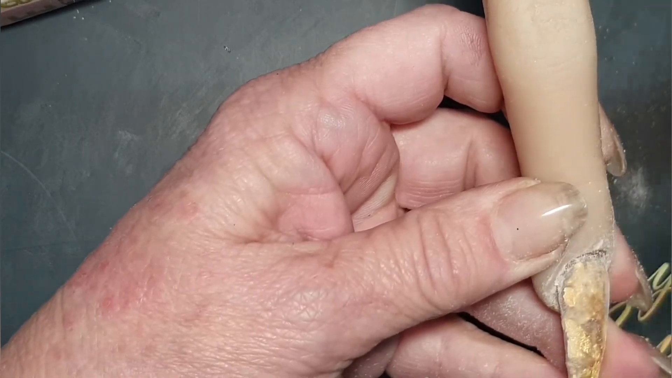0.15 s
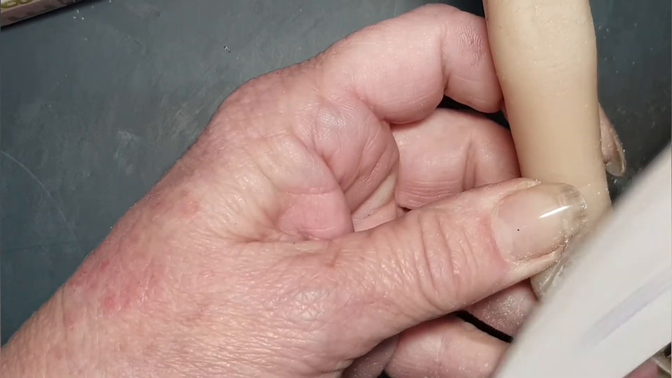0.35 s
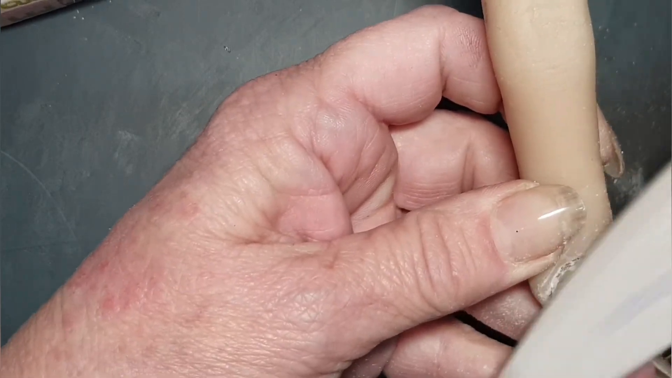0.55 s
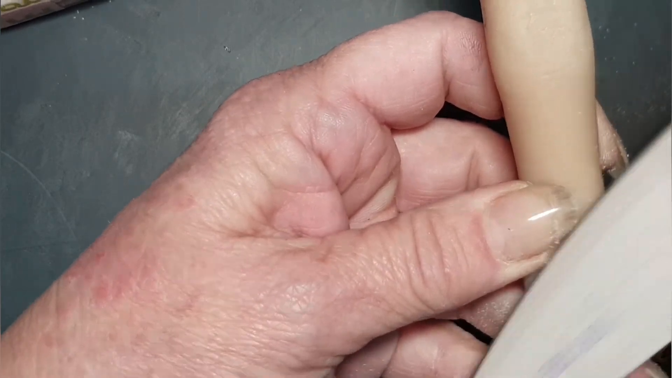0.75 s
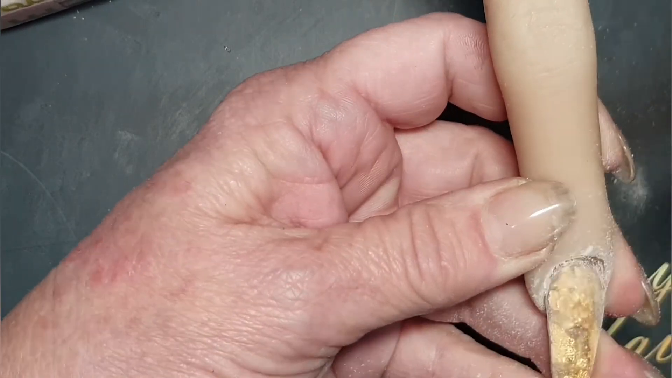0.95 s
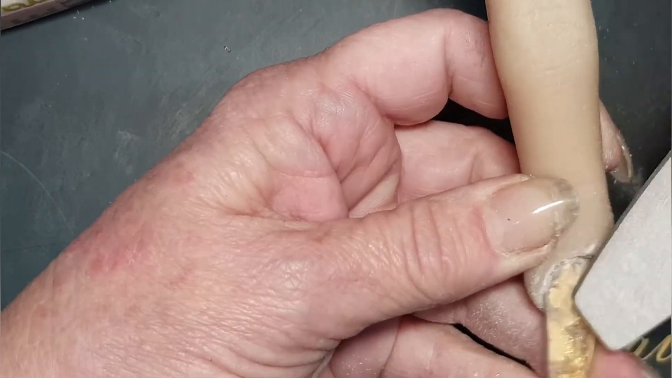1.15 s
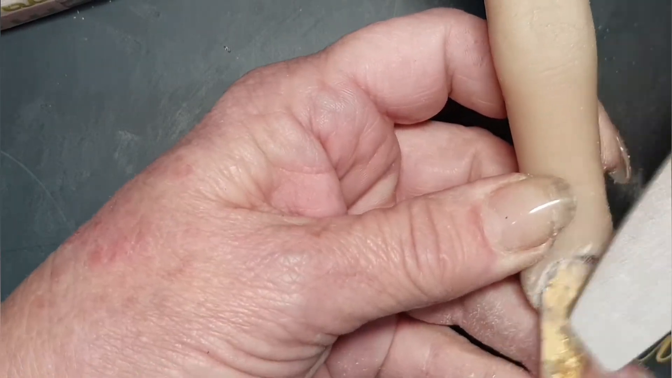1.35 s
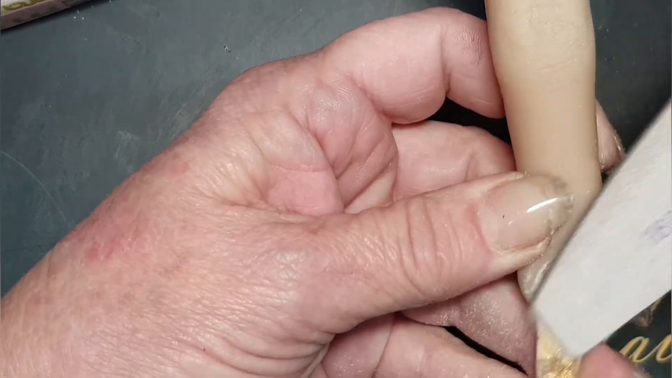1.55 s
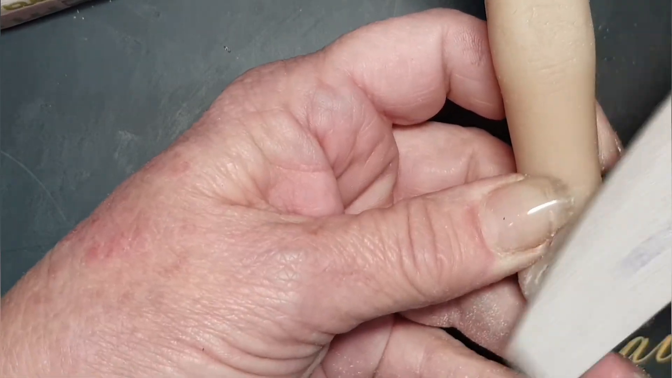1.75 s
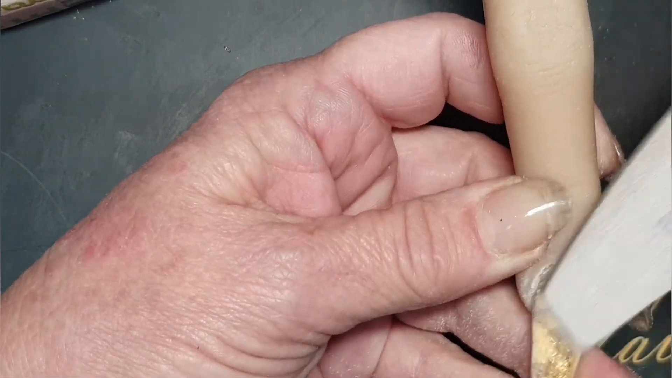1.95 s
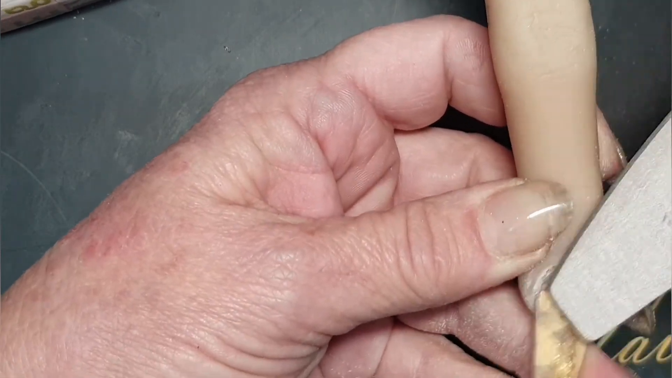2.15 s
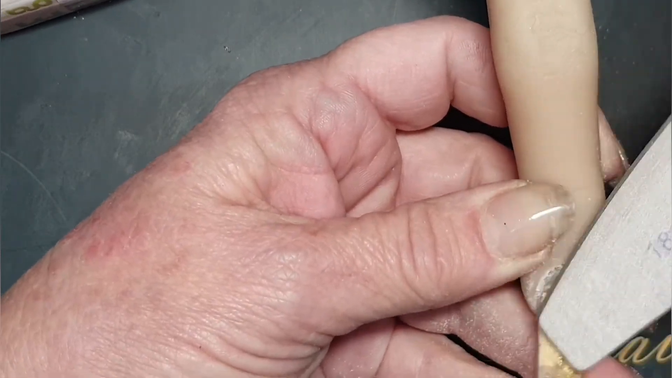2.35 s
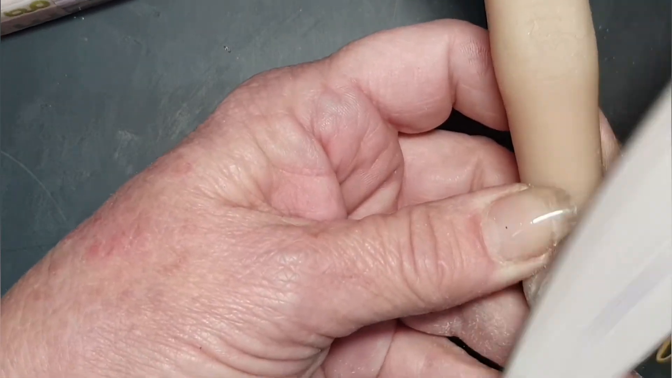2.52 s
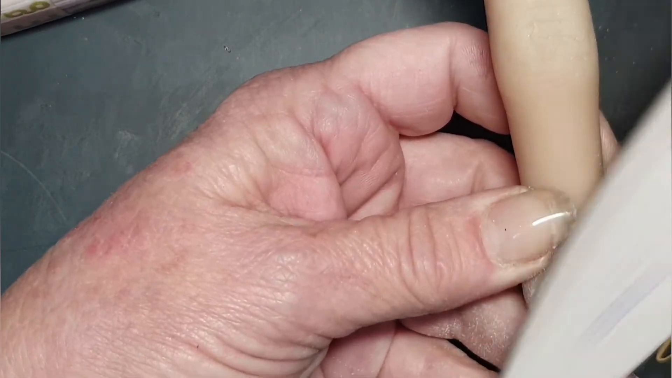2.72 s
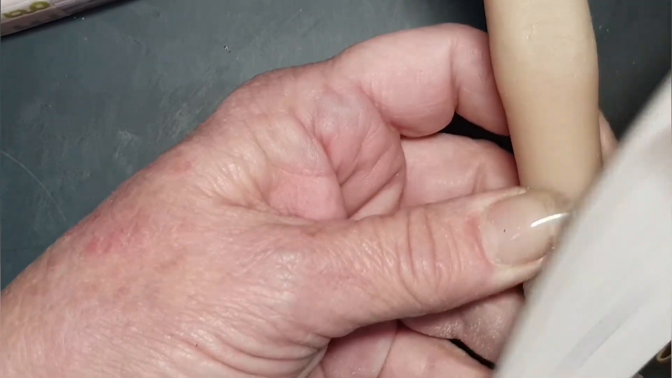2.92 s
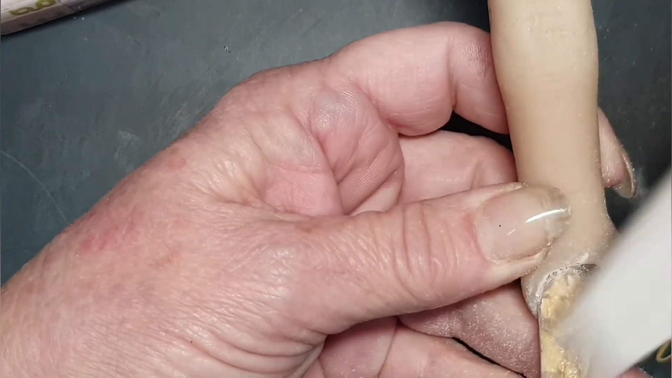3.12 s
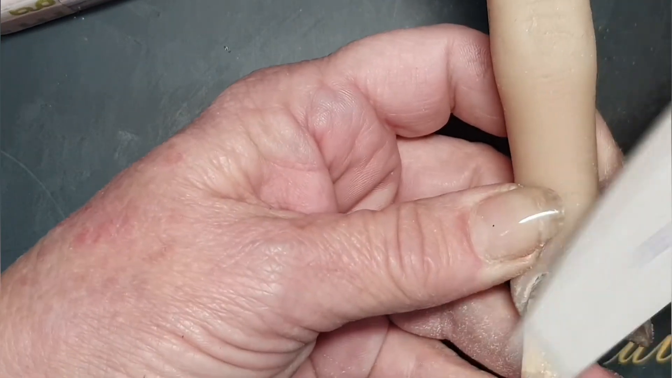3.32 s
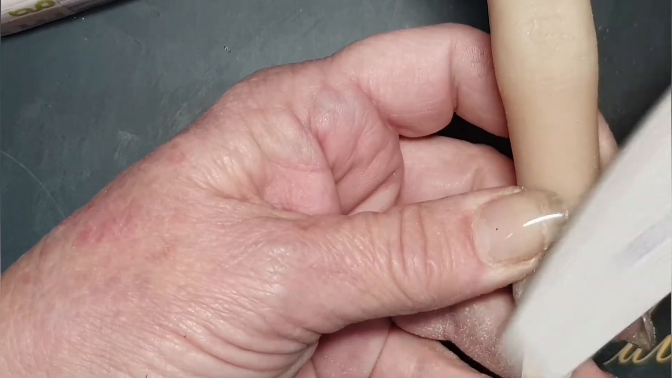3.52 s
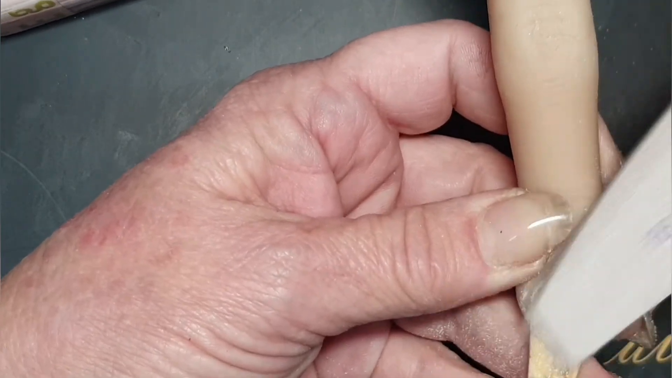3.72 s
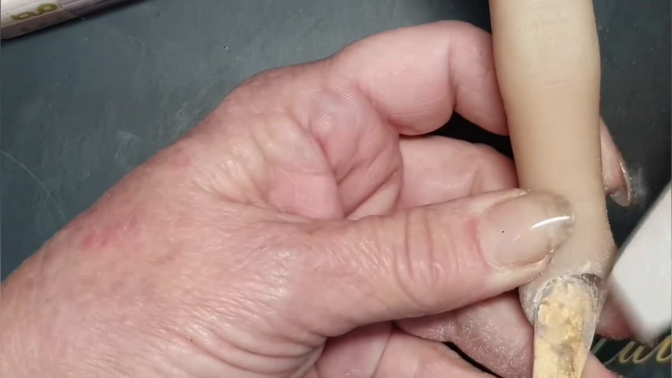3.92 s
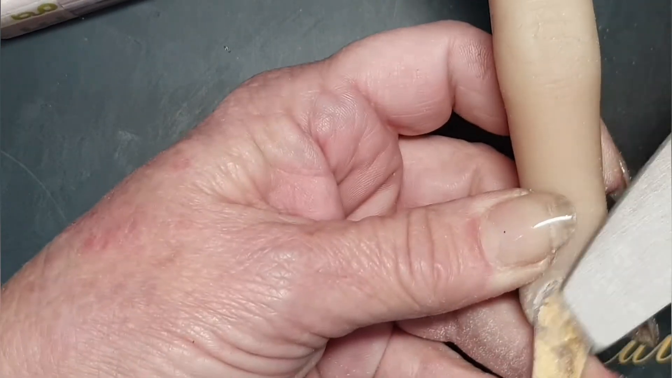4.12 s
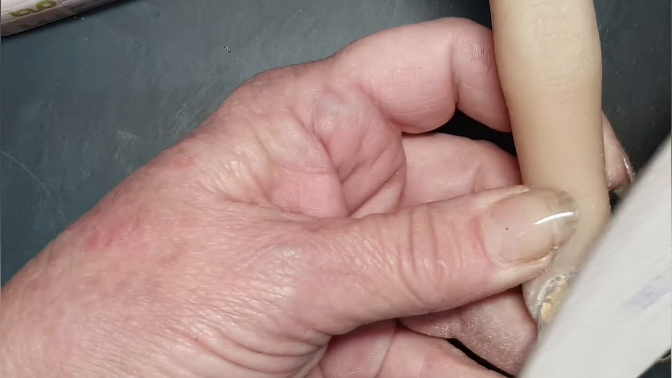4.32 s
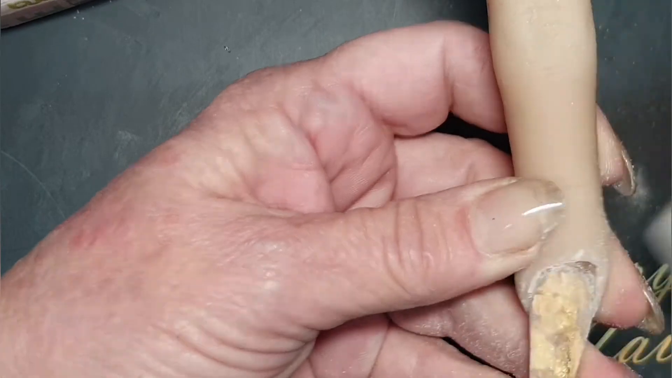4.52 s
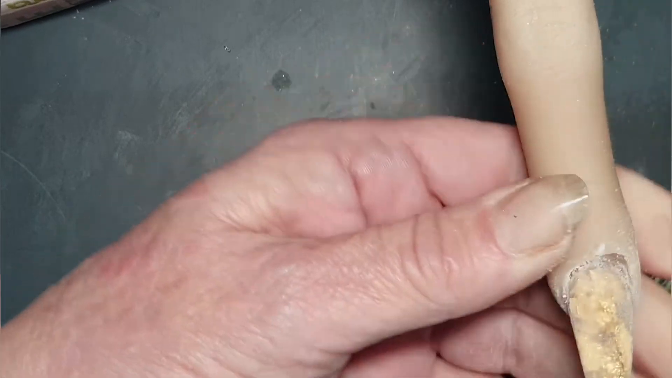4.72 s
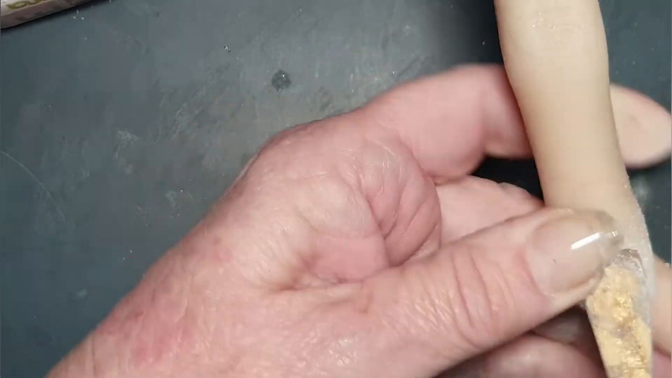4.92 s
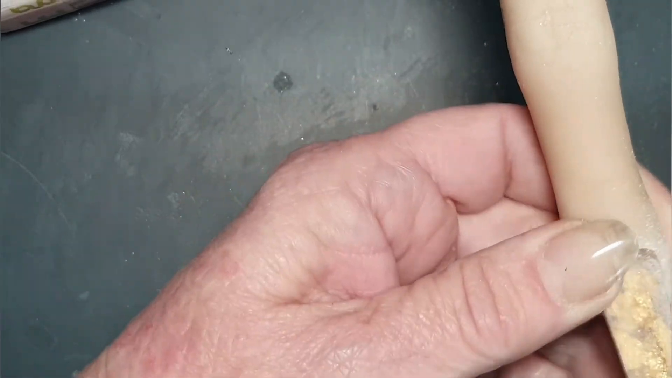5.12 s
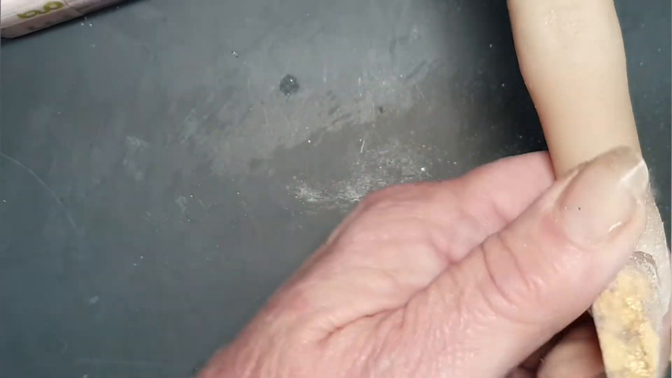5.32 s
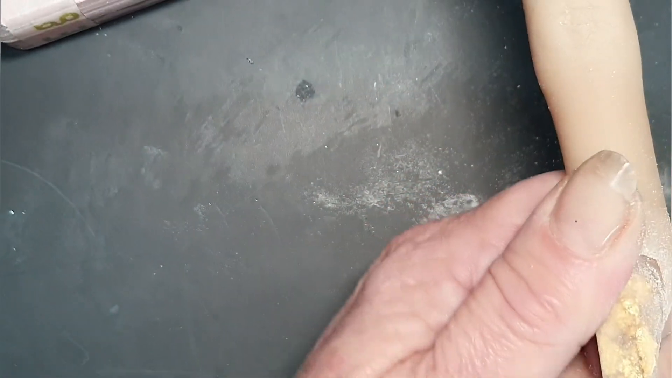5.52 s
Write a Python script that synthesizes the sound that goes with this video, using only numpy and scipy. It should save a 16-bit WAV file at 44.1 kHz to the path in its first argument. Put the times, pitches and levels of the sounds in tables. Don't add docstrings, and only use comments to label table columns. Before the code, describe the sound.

Close up in a small quiet room, a fine hand file scrapes a hard acrylic nail on a practice finger, quick gritty strokes to and fro in five bouts, each push shaking the desk with a low dull thump. Bouts end in short bright skids. Then the loose file slides away with a faint singing scrape, and a thumb wipes dust off with soft hiss and tiny crackles. Stereo microphones stand on the same desk.

```python
import sys
import numpy as np
from scipy import signal
from scipy.fft import rfft, irfft, next_fast_len
from scipy.io import wavfile
from scipy.ndimage import uniform_filter1d

SR = 44100
rng = np.random.default_rng(int(sys.argv[2]) if len(sys.argv) > 2 else 0)


def store_wav(level_fs):
    pcm = np.round(np.clip(np.atleast_2d(level_fs), -1, 1) * 32767)
    wavfile.write(sys.argv[1], SR, pcm.T.astype(np.int16))


def boost(x):
    u = np.asarray(x, float) / 20
    return 10 ** u


N = 250047
SIZE = next_fast_len(N + SR // 2)
HZ = np.maximum(np.arange(SIZE // 2 + 1) * SR / SIZE, 1)
CUTOFF_HZ = 15750

# [f/Hz, level/dB]
FLOOR = [(53, -19), (90, 5), (139, -27), (249, -8.5), (409, -22.5), (799, -31), (1900, -39), (2260, -35),
         (2510, -36), (15800, -40)]
FLOOR_DB = -68

# [f/Hz, level/dB]
RASP_SIDE = [(60, -18.5), (330, -13.5), (500, -8.5), (1170, -5.5), (1700, -5), (2400, 2.5), (3100, -6),
             (4100, 0.5), (5500, -2.5), (6300, 2), (7300, -0.5), (7700, -22), (9200, -10.5), (15000, -18)]
# [f/Hz, level/dB]
LEAN = [(60, -7), (92, 2), (140, -9.5), (210, -4), (330, -2), (500, 0.0), (770, -6.5), (1170, -10),
        (1790, -8), (2740, 3), (4190, -3.5), (6410, -4), (9810, -0.5), (15000, -3.5)]
PORT_QUADRATURE = 0.69

# [start t/s, length t/s, rasp level/dB, desk level/dB, swell level/dB]
PUSHES = [(0.017, 0.073, -39, -45.5, 9.5), (0.476, 0.06, -47, -51, 3), (0.683, 0.045, -50, -50, 2),
          (0.868, 0.063, -44, -46.5, 9), (1.145, 0.05, -41.5, -48, 6.5), (1.337, 0.053, -43.5, -46, 1),
          (1.531, 0.051, -41, -45, -0.5), (1.727, 0.044, -40.5, -42.5, 1), (1.92, 0.062, -42, -48, 0.5),
          (2.132, 0.061, -41, -43.5, 0.5), (2.342, 0.055, -41.5, -44, 2), (2.548, 0.057, -41, -43, -0.5),
          (2.753, 0.062, -43, -47, -1), (2.958, 0.063, -42.5, -46.5, -2.5), (3.286, 0.058, -40.5, -45, 2),
          (3.485, 0.054, -40, -41.5, 1.5), (3.686, 0.059, -43, -47, -2.5), (3.882, 0.06, -48, -49, 11.5),
          (4.1, 0.055, -49.5, -64.5, 5), (4.295, 0.049, -48.5, -51, 7), (4.489, 0.084, -42, -44.5, -3)]
# [start t/s, length t/s, rasp level/dB, desk level/dB, swell level/dB]
PULLS = [(0.372, 0.056, -44.5, -49.5, -0.5), (0.584, 0.051, -47.5, -56.5, -0.5),
         (0.766, 0.054, -46, -55, 6), (1.076, 0.034, -42, -57.5, 5), (1.237, 0.051, -42.5, -53.5, -3.5),
         (1.431, 0.064, -42.5, -49, -7), (1.63, 0.056, -43, -49.5, 0), (1.818, 0.055, -44.5, -48.5, 6.5),
         (2.029, 0.066, -42.5, -49, -1), (2.236, 0.067, -42.5, -49.5, -1.5), (2.442, 0.06, -43, -52.5, 0),
         (2.646, 0.062, -42.5, -53, -0.5), (2.853, 0.061, -41, -49.5, 1.5), (3.215, 0.033, -46, -56, 5.5),
         (3.38, 0.066, -40.5, -48.5, -0.5), (3.576, 0.064, -44, -51, 0.5),
         (3.785, 0.053, -46.5, -55.5, -1.5), (4.194, 0.058, -44.5, -55, -2), (4.381, 0.065, -46, -52, 8)]

# [f/Hz, width f/Hz, level/dB]
DESK = [(222.6, 11.5, -5.5), (253.9, 10.1, -5), (287.8, 20.3, -0.5), (328.1, 17.7, 3), (485.2, 30.4, -7.5),
        (704, 190, -22.5), (852, 43, -20)]
# [f/Hz, width f/Hz, level/dB]
STAND = [(114.8, 19.5, -0.5), (127.8, 17, -2), (145.9, 15.8, -0.5), (162.6, 27.2, 1.5)]
# [t/s, sway level/dB]
SWAY = [(0.0, -66), (0.1, -51), (0.18, -67), (0.28, -60), (0.55, -60), (0.9, -55), (1.02, -61), (1.3, -50),
        (1.8, -57.5), (2.13, -50), (2.63, -57), (3.02, -51.5), (3.17, -62), (3.33, -48), (3.7, -53.5),
        (4.3, -49.5), (4.72, -50), (5.0, -62)]
SWAY_HZ, SWAY_WANDER_HZ = 72.6, 3.03
THUD_PER_SHAKE_DB, THUD_PER_SWAY_DB, THUD_RISE_S, THUD_FALL_S = -5.5, -7.5, 0.038, 0.17
# [t/s, length t/s, sway level/dB, thud level/dB]
BUMPS = [
    (3.413, 0.2, -76, -41),
    (4.436, 0.016, -55, -39),
    (4.675, 0.045, -47.5, -52),
    (4.894, .02, -54, -74),
    (5.202, 0.15, -59.5, -64.5),
]
BUMP_EDGE_S = 0.026
# [t/s, thud level/dB, upper desk level/dB, nail ring level/dB, left minus right level/dB]
BRACE = [(0.05, 2.5, 9.5, -2, -0.1), (0.4, 3, -8, 0.5, 0), (0.5, -9, 8.5, 2, -1), (0.61, 4.5, 0.5, 8, -1),
         (0.71, 2, 3.5, 0, 0), (0.8, 4.5, 3, 8.5, -1), (0.9, -3, -3.5, 2, 0.5), (1.11, 5, -1, -9, 0.2),
         (1.18, 0, 1, -6, 0), (1.27, 4.5, -3, -4, -1.5), (1.37, 2.5, 2, -1, 0.5), (1.46, -1, 0.5, -1, -1),
         (1.56, 0, 2, 2, 0.5), (1.66, 4.5, -3, 2, 1.5), (1.76, -0.5, -3.5, 1.5, 2.5),
         (1.85, -3, 3, -1, 1.5), (1.95, 4.5, 10.5, 2, 1.5), (2.06, -2.5, 5, 3.5, 1), (2.16, 2, 4, 2, 2),
         (2.26, 6, -3, 6, 0), (2.37, 3, 3, 4, 3.5), (2.47, 8, 5.5, 4.5, 2), (2.58, 0.5, 1.7, 5, 2),
         (2.67, 0.5, 4, 4, 1), (2.78, -3, 5.5, 4.5, 1.5), (2.88, 3.5, 3.5, 0, 1.5),
         (2.98, 6.5, -2.5, 7.5, 3.5), (3.25, 5.5, -6, 6.5, 2.5), (3.32, -0.5, 5.5, -5, 1.5),
         (3.41, -0.5, 5.5, 1, 1.5), (3.51, -2, -1.5, 2, 2), (3.61, -1.5, 4, -3.5, 2),
         (3.72, -3.5, -1.5, 1, 3.5), (3.82, 8.5, 9, 3, -1.5), (3.91, 6.5, 3.5, 5, 0.5),
         (4.13, -4.5, -13, -7, 0), (4.22, 4, 2, 4, -1.5), (4.33, 1, 5, -6, 3), (4.41, -5.5, 3, 6, 1.2),
         (4.52, 0.5, -2.5, 0, 3)]
# [t/s, f/Hz, peak level/dB, t60 t/s]
KNOCKS = [
    (0.02, 490, -35, 0.062),
    (0.028, 910, -47.5, 0.11),
    (0.037, 300, -35, 0.065),
    (4.677, 128, -33, 0.23),
    (3.5, 180, -45, 0.27),
]

# [end t/s, length t/s, level/dB]
FLICKS = [
    (0.02, .06, -58),
    (0.099, .017, -38),
    (0.94, .018, -40),
    (3.027, .021, -32),
    (3.949, .017, -41),
    (4.563, .02, -35),
]

# [f/Hz, level/dB per Hz]
RASP = [(330, -28), (560, -17), (617, -18.5), (851, -14), (1390, -18), (1730, -17), (2420, -17),
        (3110, -5.5), (4000, -14), (4800, -13.5), (6340, -12), (7820, -2), (9910, -5.5), (15100, -2.5),
        (15700, -5)]
# [f/Hz, width f/Hz, boost level/dB]
RINGS = [(3120, 200, 5), (4755, 160, 6), (5690, 770, 5.5), (7590, 540, 5), (8130, 370, 2.5),
         (10500, 300, -4)]
# [t/s, top sheen level/dB, nail ring level/dB, finger body level/dB]
ANGLE = [(0.06, -4.5, -13, 0), (0.42, 1.5, -8, -6), (0.8, -0.5, -8.5, -1), (1.1, -8, -12, 0),
         (1.25, -2.5, -8.5, 4), (1.46, -4.5, -12, -7), (1.78, -8.5, -11.5, -3), (2.05, 0.5, -11, -1),
         (2.22, 4, -13.5, -7.5), (2.38, -3, -16.5, -3), (2.7, 2, -14.5, -7), (3.0, 3, -14, -5),
         (3.23, -4.5, -13.5, -3), (3.42, 7, -12.5, -13.5), (3.8, -0.5, -10, 4.5), (3.95, 12, -16.5, -4),
         (4.25, -3, -12.5, 4.5), (4.55, 1, -11.5, 1.5)]
# [t/s, nail slide -1..1, file slide -1..1, face level/dB, file ring level/dB]
CONTACT = [(0.05, 0.033, 0.34, 1.5, -14), (0.4, -0.22, -0.53, -2.5, -5), (0.5, 0.58, 0.48, 2.5, -12),
           (0.61, -0.47, -0.32, 1, -6), (0.71, -0.28, -0.68, 3.5, -13), (0.8, -0.23, -0.011, -3.5, -10),
           (0.9, -0.2, 0.6, 2, -12), (1.11, 0.53, 0.26, -5, -1), (1.18, 0.29, 0.47, -2, -11),
           (1.27, 0.35, 0.46, 0.5, 0), (1.37, 0.33, 0.31, 1.5, -1), (1.46, 0.46, 1.1, 2.5, -1.5),
           (1.56, -0.33, -0.14, 2.5, -1.5), (1.66, 0.71, 0.3, -1.5, 2.0), (1.76, 0.066, -0.43, 3, -2),
           (1.85, 1, 0.62, 1, 4), (1.95, -0.19, -0.96, -0.5, -1.5), (2.06, 0.31, 0.29, -0.5, 5.5),
           (2.16, -0.14, -0.33, 0.5, 3), (2.26, 0.32, 0.25, 3.5, 1.5), (2.37, 0.03, -0.31, 5, -1),
           (2.47, 0.043, 0.46, 2.5, 3), (2.58, 0.3, -0.52, 1.5, 0.5), (2.67, 0.32, 0.61, 2, 1),
           (2.78, -0.31, -0.14, 4.5, 2.5), (2.88, 0.79, 0.06, -1.5, 3.5), (2.98, 0.16, 0.22, 4.5, 3),
           (3.25, 0.74, -0.15, -2.5, 3.5), (3.32, 0.49, 0.062, -1, 1), (3.41, 0.51, 0.52, 2.5, 3.5),
           (3.51, -0.084, -0.33, 0.5, 1), (3.61, 0.46, 0.63, -2.5, 4), (3.72, 0.19, -0.44, -0.5, 1),
           (3.82, -0.52, 0.39, -0.5, 1.0), (3.91, 0.11, 0.47, 6, 6.5), (4.13, -0.086, -0.22, -0.5, -1),
           (4.22, 0.28, 0.65, -1, -1.5), (4.33, 0.91, 0.56, -2.5, 0.5), (4.41, -0.074, 0.55, -1.5, 1.5),
           (4.52, 0.17, 0.75, 0.5, -3.5)]
# [t/s, extra mid-stroke level/dB, fine grit level/dB]
ROLL = [(0.05, 2.5, -2.5), (0.4, -2, 0), (0.5, 2.5, 6.5), (0.61, -5, 4), (0.71, 1, 7), (0.8, -1, 3),
        (0.9, -1, -1), (1.11, 2.5, -1.5), (1.27, -4, 1.5), (1.56, 0, 2.5), (2.37, -1.5, 2), (2.67, -1, 2),
        (2.98, -2.5, 0), (3.32, 0.5, -1), (3.72, 0.5, 1), (4.13, -0.5, 1.5), (4.41, 3.5, -2.5)]
# [low f/Hz, high f/Hz, width f/Hz]
NAIL_SLIDE = (2970, 3480, 620)
# [low f/Hz, high f/Hz, width f/Hz]
FILE_SLIDE = (7620, 8520, 1200)
PULL_SHEEN_DB, PULL_NAIL_DB, PULL_FACE_DB = 4.5, 1.9, 4
BODY_DB, BODY_PER_WEIGHT = -13.5, 1.6
FACE_DB, FACE_PER_NAIL = -13.5, 0.82
PUSH_MIDDLE_DB, PULL_MIDDLE_DB, LAST_MIDDLE_DB = -3, -2.5, 1.5
MIDDLE_RING_DB = 6

# [t/s, peak level/dB]
TOUCHES = [
    (0.3726, -29.5),
    (1.076, -30),
    (3.2146, -43),
    (4.105, -54),
]

# [t/s, level/dB]
WIPE = [
    [(4.62, -45.5), (4.678, -60.5), (4.706, -55.5), (4.765, -54), (4.816, -53.5), (4.87, -49.5),
     (4.888, -62.5), (4.94, -61.5), (5.03, -77)],
    [(5.04, -73), (5.082, -60), (5.16, -70), (5.196, -72), (5.232, -62), (5.344, -55.5), (5.442, -53.5),
     (5.52, -56.5)],
    [(5.53, -55), (5.554, -47.5), (5.586, -49), (5.618, -65), (5.67, -73)],
]
# [t/s, level/dB]
FIRMNESS = [(4.62, 16), (4.72, -2.5), (5.04, 4.5), (5.09, -41), (5.24, -44), (5.34, -3), (5.45, -23),
            (5.67, -8)]
# [f/Hz, level/dB per Hz]
SKIN = [(410, -19), (700, -11.5), (1630, -18), (2510, -14), (3100, -12), (4890, -10.5), (9380, -6),
        (15800, -0.5)]
# [start t/s, end t/s, f/Hz, width f/Hz, level/dB]
SINGING = [(4.69, 4.77, 5800, 260, -65), (4.74, 4.81, 5550, 350, -67), (4.69, 4.79, 4950, 300, -64),
           (4.79, 4.895, 4950, 260, -63), (4.82, 4.885, 2500, 400, -61), (4.8, 4.87, 3150, 250, -67),
           (4.67, 4.94, 7620, 130, -71), (4.75, 4.81, 4000, 1600, -66), (4.74, 4.885, 6620, 200, -70),
           (4.83, 4.872, 9300, 500, -63), (5.115, 5.165, 8500, 300, -74), (5.568, 5.579, 2600, 400, -64),
           (5.545, 5.572, 5800, 2200, -62), (4.651, 4.659, 2000, 3000, -63)]
# [t/s, peak level/dB, f/Hz]
CRACKS = [(5.0569, -52, 9200), (5.0814, -48, 14600), (5.1214, -49, 8600), (5.127, -55, 7000),
          (5.2973, -39.5, 7650), (5.2973, -47, 14500), (5.3155, -50, 8350), (5.3168, -50, 12000),
          (5.3575, -49, 9500), (5.377, -45, 7540), (5.377, -50, 11500), (5.395, -51, 8500),
          (5.404, -52, 10000), (5.42, -46, 9200), (5.421, -48, 11400), (5.474, -52, 9500),
          (5.4814, -44, 10600), (5.4814, -48, 7000), (5.507, -46, 8000), (5.516, -49, 13000),
          (5.527, -47, 8500), (5.592, -47, 7000)]
LET_GO_DB, LET_GO_DB_PER_S, LET_GO_S, WIPE_DESK_DB = -52.5, -25, 5.0, -41
THUMB_DULL_DB = -8

# [f/Hz, t60 t/s, level/dB]
ROOM = [(696, 0.29, -1), (1710, 0.19, -4.5), (3540, 0.23, -7), (7600, 0.3, -10.5), (13100, 0.21, -11)]


def rms_one(x):
    return x / np.sqrt(np.mean(x ** 2) + 1e-20)


def in_time(rows):
    s, *columns = np.transpose(rows)
    return [np.interp(np.arange(N) / SR, s, c) for c in columns]


def at_hz(points, hz=HZ):
    point_hz, point_db = np.transpose(points)
    return np.interp(np.log(hz), np.log(point_hz), point_db)


def drift(rate):
    r = np.exp(-80 * np.pi * rate / SR)
    white = rng.standard_normal(N // 40 + 2002)
    slow = signal.lfilter([1], [1, -2 * r, r * r], white)[2000:]
    return np.interp(np.arange(N) / 40, np.arange(len(slow)), rms_one(slow))


def resonate(x, hz, width_hz):
    r = np.exp(-np.pi * width_hz / SR)
    poles = [1, -2 * r * np.cos(2 * np.pi * hz / SR), r * r]
    return signal.lfilter([(1 - r * r) / 2, 0, (r * r - 1) / 2], poles, x + 1e-18)


def grit(spread_db):
    size_db = spread_db * np.clip(rng.standard_normal(N), -2, 2)
    return rms_one(rng.standard_normal((2, N)) * boost(size_db))


def colour(pair, gain, side_db=0.0):
    gain = gain / np.sqrt(np.mean(gain ** 2))
    mid, side = rfft(pair, SIZE)
    side = np.sqrt(1 - PORT_QUADRATURE ** 2) * side + 1j * PORT_QUADRATURE * mid
    mid = mid * gain
    side = side * gain * boost(at_hz(RASP_SIDE) + side_db)
    lean = boost(at_hz(LEAN) / 2)
    return np.array([(mid + side) * lean, (mid - side) / lean])


def strokes():
    rows = np.array(sorted([(*row, 0) for row in PUSHES] + [(*row, 1) for row in PULLS]))
    rest = rows[1:, 0] - rows[:-1, 0] - rows[:-1, 1] > .1
    return rows.T, np.r_[False, rest], np.r_[rest, True]


def stroke_shape(levels_db, rise_s, fall_s, lag_s=0.0):
    out, time = np.zeros(N), np.arange(N) / SR
    (start, length, rasp_db, desk_db, _, _), lands, leaves = strokes()
    bite = np.clip((desk_db - rasp_db + 12.0) / 10.0, 0, 1)
    rows = zip(start + lag_s, length, levels_db, bite, lands, leaves)
    for s, span, db, heavy, sharp_in, sharp_out in rows:
        rise = rise_s * (.1 if sharp_in else 1.3 - .8 * heavy)
        fall = fall_s * (.1 if sharp_out else 1)
        nodes = [s - rise, s, s + 0.011 * span, s + .5 * span, s + 0.93 * span,
                 s + span * 1.163, s + span * 0.99 + fall]
        first_db = db[0] - (1.5 if sharp_in else 7.0 - 10.4 * heavy)
        last_db = db[2] - (1.5 if sharp_out else 6.0)
        out += np.interp(time, nodes, [0, boost(first_db), *boost(db), boost(last_db), 0], 0, 0)
    return out


def floor():
    waves = colour(rng.standard_normal((2, N)), boost(at_hz(FLOOR)), side_db=5.0)
    return boost(FLOOR_DB) * irfft(waves, SIZE)[:, :N]


def stand_drive():
    time, (lean_db,) = np.arange(N) / SR, in_time(SWAY)
    sway = boost(lean_db)
    weight_db = np.outer(strokes()[0][3] + THUD_PER_SHAKE_DB, np.ones(3))
    thud = boost(lean_db + THUD_PER_SWAY_DB) + stroke_shape(weight_db, THUD_RISE_S, THUD_FALL_S)
    for s, length, sway_db, thud_db in BUMPS:
        nodes = [s - BUMP_EDGE_S, s, s + length, s + length + BUMP_EDGE_S]
        bump = np.interp(time, nodes, [0, 1, 1, 0])
        sway, thud = sway + boost(sway_db) * bump, thud + boost(thud_db) * bump
    return sway, thud


def modes(white, push, table):
    out = 0
    for k, (hz, width, db) in enumerate(table):
        ring = rms_one(resonate(white, hz, width))
        ring = rms_one(ring / (.1 + uniform_filter1d(ring ** 2, size=SR // 20)) ** .35)
        r = np.exp(-3.5 * width / SR)
        drive = np.sqrt(signal.lfilter([1 - r], [1, -r], push ** 2))
        grip = boost(db + 1.3 * drift(3.9))
        out = out + (-1) ** k * grip * ring * drive
    return out


def knocks():
    out = 0
    for s, hz, db, t60 in KNOCKS:
        since = np.maximum(np.arange(N) / SR - s, 0)
        swell = np.minimum(since * hz, 1)
        out = out + boost(db - 60 * since / t60) * swell * np.sin(2 * np.pi * hz * since)
    return out


def desk():
    push_db = strokes()[0][3][:, None] + [-1.5, 1.5, -1.5]
    push = stroke_shape(push_db, 0.028, 0.027, lag_s=0.00051)
    leave_s = WIPE[0][0][0]
    since = np.arange(N) / SR - leave_s
    let_go = boost(LET_GO_DB + LET_GO_DB_PER_S * since) * np.clip((LET_GO_S - leave_s - since) / 0.031, 0, 1)
    push = push + (since > 0) * (let_go + boost(in_time(sum(WIPE, []))[0] + WIPE_DESK_DB))
    white = rng.standard_normal((2, 2, N))
    lean, thud = stand_drive()
    turn = 2 * np.pi * np.cumsum(SWAY_HZ + SWAY_WANDER_HZ * drift(14.6)) / SR
    wobble = boost(1.4 * drift(26) + 2.76 * drift(13.0))
    sway = np.sqrt(2) * np.array([np.sin(turn), np.cos(turn)]) * lean * wobble
    thud_db, upper_db = in_time(BRACE)[:2]
    shake = modes(white[0], push * boost(-5.5), DESK[:4])
    shake = shake + modes(white[0], push * boost(upper_db - 7.0), DESK[4:])
    shake = shake + modes(white[1], thud * boost(thud_db - 8.0), STAND) + sway
    shake[0] += knocks()
    return irfft(colour(shake, np.ones(len(HZ))), SIZE)[:, :N]


def skids():
    time, skid = np.arange(N) / SR, np.zeros(N)
    for end, length, db in FLICKS:
        nodes = [end - length, end - .7 * length, end - .003, end]
        skid += boost(db) * np.interp(time, nodes, [0, .8, 1, 0], 0, 0)
    bright = boost(at_hz([(3000, -28), (8000, -14.5), (11000, -4.5), (13000, 2.5), (15200, -16)]))
    return irfft(colour(grit(7.0) * skid, bright), SIZE)[:, :N]


def stroke_colours():
    (start, length, rasp_db, desk_db, _, pull), _, _ = strokes()
    pull, weight_db = in_time(np.transpose([start + length / 2, pull, desk_db - rasp_db]))
    sheen_db, nail_db, body_db = in_time(ANGLE)
    face_db = FACE_DB + FACE_PER_NAIL * (nail_db + 13.0) + PULL_FACE_DB * pull
    body_db = BODY_DB + body_db + BODY_PER_WEIGHT * weight_db
    return sheen_db + PULL_SHEEN_DB * pull, nail_db + PULL_NAIL_DB * pull, body_db, face_db


def slide(x, place, ring):
    low_hz, high_hz, width_hz = ring
    return x + np.clip(place, -1, 1) * (resonate(x, high_hz, width_hz) - resonate(x, low_hz, width_hz))


def desk_echo(x, share):
    lag = SR * (0.000457 + .00006 * drift(8.7))
    at = np.arange(N) - lag
    return np.array([c + share * np.interp(at, np.arange(N), c) for c in x])


def rasp_speed():
    (start, length, rasp_db, _, swell_db, pull), _, last = strokes()
    middle_db = np.where(last, LAST_MIDDLE_DB, np.where(pull, PULL_MIDDLE_DB, PUSH_MIDDLE_DB))
    middle_db = middle_db + in_time(ROLL)[0][((start + length / 2) * SR).astype(int)]
    bend_db = np.transpose([-(middle_db + swell_db), middle_db, swell_db - middle_db]) / 2
    speed = stroke_shape(rasp_db[:, None] + bend_db, 0.0092, 0.019) * boost(0.7 * drift(69))
    for end, _, _ in FLICKS[1:]:
        speed[round(end * SR):round((end + .03) * SR)] = 0
    return speed


def rasp():
    sheen_db, nail_db, body_db, face_db = stroke_colours()
    start, length = strokes()[0][:2]
    ends = np.ravel([start, start + length], "F")
    along = np.interp(np.arange(N) / SR, ends, np.tile([-1, 1], len(start)))
    boost_db = sum(db / (1 + (2 * (HZ - hz) / width) ** 2) for hz, width, db in RINGS)
    waves = colour(grit(4.0) * rasp_speed(), boost(at_hz(RASP) + boost_db))
    place, out = 4 * np.log2(HZ / 500), 0
    angle_db = sheen_db - 0.5 + 2.0 * along
    flex = drift(0.29)
    nail_place, file_place, face_touch_db, file_db = in_time(CONTACT)
    nail_touch_db, lean_db = in_time(BRACE)[2:]
    fine_db = in_time(ROLL)[1]
    for k in range(21):
        hz = 500 * 2 ** (k / 4)
        band = irfft(waves * np.clip(1 - abs(place - k), 0, 1), SIZE)[:, :N]

        def near(centre_hz, octaves):
            return np.exp(-(np.log2(hz / centre_hz) / octaves) ** 2)

        tint_db = (.5 * near(13000, .4) - .5 * near(7900, .25)) * angle_db
        tint_db = tint_db + (nail_db + 12.0) * near(2840, 1.0)
        tint_db = tint_db + 0.38 * flex * (near(2020, 0.27) - near(6000, 0.053))
        tint_db = tint_db + (body_db + 27.0) * near(770, 0.78) + (face_db + 11.0) * near(5390, 0.084)
        tint_db = tint_db + nail_touch_db * near(3250, 0.11) + face_touch_db * near(5430, 0.51)
        tint_db = tint_db + file_db * near(8200, 0.14) + fine_db * near(10500, 0.26)
        tint_db = tint_db + MIDDLE_RING_DB * (0.5 - 2 * along ** 2) * near(8530, 0.5)
        waver_db = 0.87 * drift(13.0) + 1.76 * drift(30.0)
        out = out + band * boost(tint_db + waver_db)
    out = slide(out, 1.0 * nail_place, NAIL_SLIDE)
    out = slide(out, 0.77 * file_place, FILE_SLIDE)
    return desk_echo(out * boost(np.outer([.5, -.5], lean_db)), 0.21)


def ticks(rows, spread):
    out = np.zeros(N)
    for s, db, hz in rows:
        click = np.zeros(400)
        click[:12] = rng.standard_normal(12) * np.exp(-np.arange(12) / 3.7)
        ring = resonate(resonate(click, hz, spread * hz), hz, spread * hz)
        at = round(s * SR)
        out[at:at + 400] += boost(db + 1.0) * ring / abs(ring).max()
    return out


def touches():
    return ticks([(s, db, 7000) for s, db in TOUCHES], 1.2)


def singing():
    time, out = np.arange(N) / SR, np.zeros((2, N))
    for s, end, hz, width, db in SINGING:
        span = slice(round(s * SR), round(end * SR))
        nodes = [s, s + .35 * (end - s), end - .25 * (end - s), end]
        swell = np.interp(time[span], nodes, [0, 1, 1, 0])
        shake = rng.standard_normal((2, len(swell)))
        ring = resonate(resonate(shake, hz, width), hz, 2 * width)
        mid, side = boost(db) * rms_one(ring) * swell
        out[:, span] += [mid + .5 * side, mid - .5 * side]
    return out


def wipe():
    time = np.arange(N) / SR
    (rub_db,), (edge_db,) = in_time(sum(WIPE, [])), in_time(FIRMNESS)
    start = np.clip((time - WIPE[0][0][0]) / 0.086, 0, 1)
    dust = (rng.random(N) < 40 / SR) * rng.normal(0, 8.0, N) * (time > 5.22)
    rub = (grit(4.2) + dust) * start * boost(rub_db + 0.88 * drift(40))
    waves = colour(rub, boost(at_hz(SKIN)), side_db=1.5)
    low = np.clip(np.log(7000 / HZ) / 1.66, 0, 1)
    top = np.clip(np.log2(HZ / 10000) / 0.34, 0, 1)
    out = irfft(waves * (1 - low), SIZE)[:, :N] + boost(edge_db + 5.0) * irfft(waves * low, SIZE)[:, :N]
    flat = np.interp(time, [5.26, 5.3, 5.52, 5.54], [0, 1, 1, 0])
    out += (boost(THUMB_DULL_DB * flat) - 1) * irfft(waves * top, SIZE)[:, :N]
    out = desk_echo(out, 0.25)
    out += np.tanh(0.18 * drift(9.9)) * resonate(out, 13000, 4000)
    out += np.tanh(0.18 * drift(9.6)) * resonate(out, 5900, 2500)
    return out + singing()


def dust_cracks():
    return ticks(CRACKS, .45)


def room(x):
    time = np.arange(SR // 2) / SR
    noise = rng.standard_normal((2, 2, len(time)))
    noise = rfft(rms_one(.5 * noise[:, :1] + noise))
    bin_hz = np.arange(1, noise.shape[2] + 1) * 2
    place = np.interp(np.log(bin_hz), np.log(np.array(ROOM)[:, 0]), np.arange(len(ROOM)))
    tail = 0
    for k, (hz, t60, db) in enumerate(ROOM):
        decay = boost(-60 * time / t60) * np.clip(time / .006, 0, 1)
        band = irfft(noise * np.clip(1 - abs(place - k), 0, 1))
        tail = tail + boost(db) * band * decay / np.sqrt(np.sum(decay ** 2))
    turn = 2 * drift(4)
    paths = rfft(x.mean(axis=0) * np.array([np.cos(turn), np.sin(turn)]), SIZE)
    return irfft((paths[:, None] * rfft(tail, SIZE)).sum(axis=0), SIZE)[:, :N]


def scene():
    near = skids() + rasp() + touches() + wipe() + dust_cracks()
    return floor() + desk() + near + room(near)


def top_cut(x):
    return signal.sosfilt(signal.butter(12, 16780, fs=SR, output="sos"), x)


def record(dry):
    low_pass = signal.ellip(10, .5, 55, CUTOFF_HZ, fs=SR, output="sos")
    mix = signal.sosfilt(low_pass, dry)
    return top_cut(mix)


dry = scene()
out = record(dry)
store_wav(out)
```